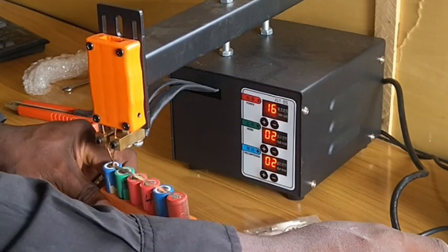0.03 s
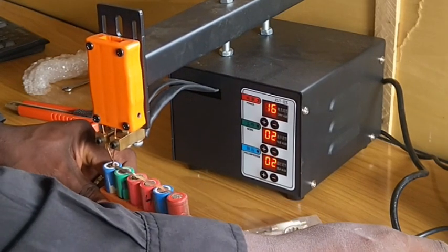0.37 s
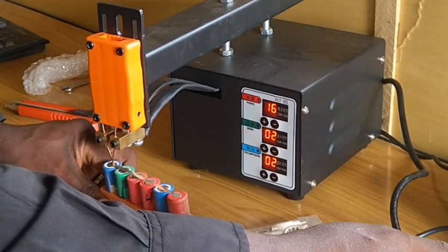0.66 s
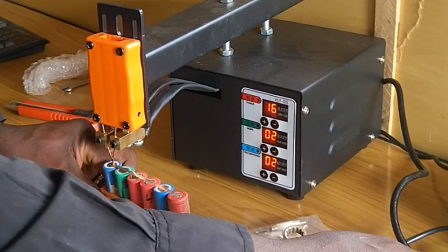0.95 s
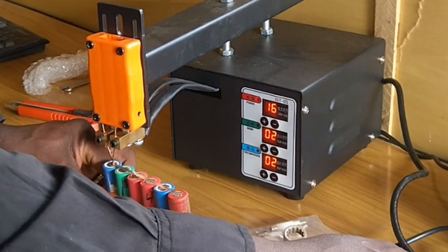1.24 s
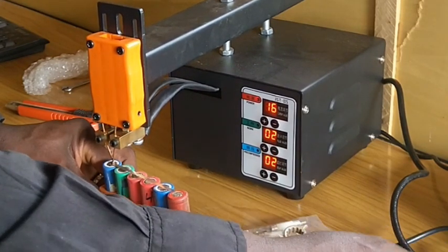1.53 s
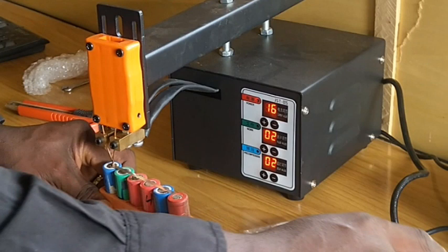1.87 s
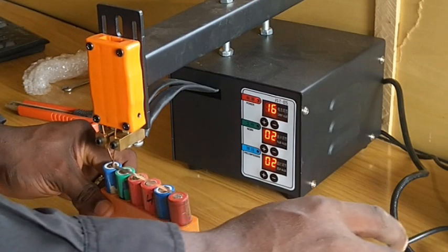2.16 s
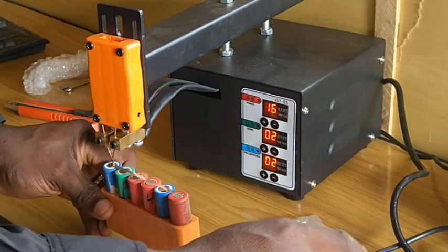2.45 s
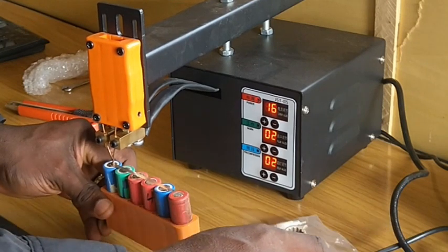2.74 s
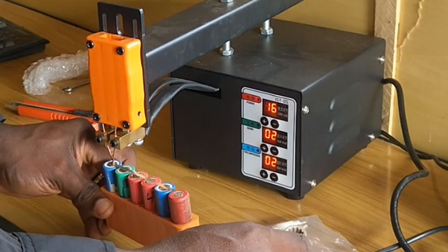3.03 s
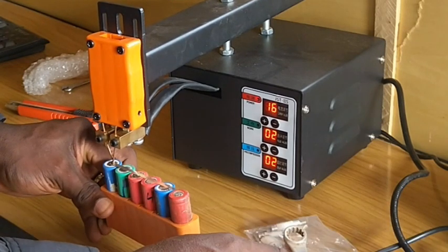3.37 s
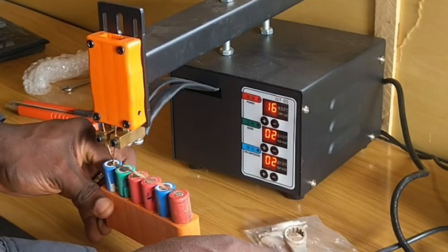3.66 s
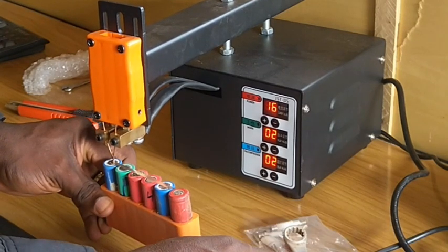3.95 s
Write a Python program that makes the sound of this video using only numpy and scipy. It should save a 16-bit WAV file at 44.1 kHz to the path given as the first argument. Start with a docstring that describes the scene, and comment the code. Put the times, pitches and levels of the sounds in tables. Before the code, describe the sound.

Two sharp metal clacks sound close by as a spot welder's head presses down and springs back in a small workshop. A low rumble runs throughout, with light double clicks, faint pings and hand rubs before and after.

```python
"""A bench spot welder fires once in a small workshop. A low rumble and a soft, swelling wash run throughout;
thin pings, a soft rub and a small double click come first. At 1 s a light catch sounds, the electrode head
clacks down with a crack and a metallic ring, and the current surge gives the case a dull knock. At 1.7 s
the head clacks back up. More pings, double clicks and rubs of hand and sleeve dot the rest."""
import sys
import numpy as np
from scipy import signal
from scipy.fft import rfft, irfft
from scipy.io import wavfile
from scipy.ndimage import uniform_filter1d

SR = 44100
rng = np.random.default_rng(int(sys.argv[2]) if len(sys.argv) > 2 else 0)


def master_out(mix):
    """Clip the mix to full scale and print it as 16-bit PCM to the path in sys.argv[1]."""
    frames = np.transpose(np.atleast_2d(mix))
    ceiling = np.clip(frames, -1, 1)
    pcm = np.round(ceiling * 32767).astype(np.int16)
    wavfile.write(sys.argv[1], SR, pcm)


N = 176400
HEAD_RISE_S = 0.003


def welder():
    """A light catch sounds, then the electrode head clacks down and springs back."""
    # strokes of the head: start_s, gain_db, back (0 = pressing down, 1 = springing back)
    strokes = [(1.0368, 0.12, 0), (1.685, 0.94, 1)]
    # colour of the catch: frequency_hz, level_db
    catch_colour = [(300, -10), (900, 4), (1300, 3), (1750, -14.5), (2800, -1), (4400, 0), (6800, -12),
                    (9000, -29), (15000, -33)]
    catch_s, catch_db, catch_t60_s = 1.004, -20.5, 0.092
    out, t = np.zeros((2, N)), np.arange(SR // 4) / SR
    catch = burst(catch_colour, t) * amp(catch_db - 60 * t / catch_t60_s)
    add(out, catch_s, catch * np.minimum(t / HEAD_RISE_S, 1))
    for start_s, gain_db, back in strokes:
        add(out, start_s, amp(gain_db) * clack(back))
    return out


def clack(back):
    """A crack of metal contact sets the head ringing; the bench top reflects both."""
    # colour of the contact crack: frequency_hz, down_db, back_db
    crack_colour = [(300, -27.5, -17.5), (702, 0, -2), (1263, -14, -1), (1430, -18, -17), (1910, -26, -21),
                    (2270, -8, -8), (3200, 6, -1.5), (5180, 3, 0.5), (6700, -2.5, -10), (7300, -10, -9.5),
                    (9220, -8.5, -10.5), (10500, -12.5, -7.5), (15490, -12, -3)]
    # modes of the head: pitch_hz, down_db, back_db, t60_s
    head_modes = [(1270, -34, -29.5, 0.072), (2240, -24, -36, 0.04), (2790, -14.5, -27, 0.041),
                  (3003, -16.5, -25, 0.036), (3250, -18.5, -31, 0.036), (3592, -13.5, -14.5, 0.037),
                  (3765, -16, -19, 0.044), (4178, -7.5, -27, 0.028), (4436, -17, -26.5, .04),
                  (4970, -30, -17.5, .055), (5050, -35, -30, .21), (5290, -18.5, -24, .05),
                  (5800, -28.5, -28, 0.034), (6400, -25, -20, .035), (13370, -42, -21.5, 0.049)]
    # stereo placement of the head: frequency_hz, left_minus_right_db
    head_pan = [(1000, -0.5), (2400, -1.5), (4400, 2), (8000, 3), (15000, 5.5)]
    crack_db, crack_rise_s, crack_t60_s = -5, 0.0018, 0.043
    head_db, pressed_ring = 2, 0.8  # pressing on the work shortens the ring to this share
    bench_db, bench_delay_s, right_delay_s = -14.5, 0.0054, 0.000045
    t = np.arange(SR // 4) / SR
    hz = np.fft.rfftfreq(len(t), 1 / SR)
    crack = burst([(f, up if back else down) for f, down, up in crack_colour], t)
    crack *= np.minimum(t / crack_rise_s, 1) * amp(crack_db - 60 * t / crack_t60_s)
    modes = [(f, up, t60) if back else (f, down, t60 * pressed_ring) for f, down, up, t60 in head_modes]
    body = rattling(modes, t) * amp(head_db) * np.minimum(t / HEAD_RISE_S, 1)
    bench_echo = amp(bench_db) * np.exp(-2j * np.pi * hz * bench_delay_s)
    stereo = pan(curve_at(head_pan, hz)) * np.exp(-2j * np.pi * hz * np.array([[0], [right_delay_s]]))
    return irfft(rfft(crack + body) * (1 + bench_echo) * stereo, len(t))


def rattling(modes, t, line_width_hz=150, settle_s=0.07):
    """Dying modes whose pitch jitters until the loose parts settle."""
    phase_step = np.sqrt(2 * np.pi * line_width_hz / SR * np.exp(-t / settle_s))
    drifts = np.cumsum(phase_step * rng.standard_normal((len(modes), len(t))), axis=1)
    return sum(amp(db - 60 * t / t60) * np.sin(2 * np.pi * hz * t + drift)
               for (hz, db, t60), drift in zip(modes, drifts))


def weld_pulse(start_s=1.0466, rise_s=0.0024, thud_db=-16.5, thud_t60_s=0.072):
    """The current surge gives the case one short, dull knock."""
    # modes of the case: pitch_hz, level_db, t60_s
    case_modes = [(698, -14.5, 0.025), (860, -7.5, 0.021), (1020, -20, 0.063)]
    # colour of the noisy thud in the knock: frequency_hz, level_db
    thud_colour = [(300, -23), (550, -4), (680, 7.5), (1050, 7), (1250, -5), (1500, -22), (3000, -50)]
    out, t = np.zeros((2, N)), np.arange(SR // 4) / SR
    thud = burst(thud_colour, t) * amp(thud_db - 60 * t / thud_t60_s)
    add(out, start_s, (ring(case_modes, t) + thud) * np.minimum(t / rise_s, 1))
    return out


def clicks(split_hz=4500, snap_t60_s=0.0092, pan_db=-4):
    """Light clicks, mostly in pairs: a bright snap and a very short ring."""
    # the clicks: start_s, low_ring_db, high_ring_db, snap_db
    hits = [(.034, -65, -63.5, -51), (0.465, -53, -40.5, -63.5), (0.4838, -37, -44.5, -61),
            (1.3100, -62, -40, -49), (1.3308, -34.5, -34.5, -58), (1.3488, -38, -51, -48.5),
            (2.1666, -38, -35, -48.5), (2.1896, -39.5, -44, -40), (3.0234, -37.5, -42, -65),
            (3.0487, -39, -36, -59), (3.463, -65.5, -59, -56), (3.8845, -42, -40, -41.5),
            (3.9031, -37, -48, -62.5)]
    # ring of a click: pitch_hz, level_db, t60_s
    click_modes = [(2140, -12, .015), (2490, -2.5, 0.01), (3380, -17, 0.0077), (5400, -9.5, 0.0071),
                   (5980, -8, 0.01)]
    out, t = np.zeros((2, N)), np.arange(SR // 20) / SR
    for start_s, low_db, high_db, snap_db in hits:
        modes = [(hz, db + (low_db if hz < split_hz else high_db), t60) for hz, db, t60 in click_modes]
        snap = rng.standard_normal((2, len(t))) * amp(snap_db - 60 * t / snap_t60_s)
        add(out, start_s, ring(modes, t) + snap)
    return out * pan(pan_db)


def pings():
    """Faint, thin pure tones that start abruptly and fade, each cut off after a second."""
    # the pings: start_s, pitch_hz, level_db, t60_s, left_minus_right_db
    tones = [(0.035, 13372, -48, 0.54, 6.5), (.036, 10630, -72, 1.3, -0.5), (.036, 2638, -66.5, 5.4, 1),
             (1.751, 9118, -46.5, 0.64, 2.5), (2.18, 15700, -50, .1, 3), (3.465, 10206, -46, 0.67, 5),
             (3.465, 1970, -62, 5, -4)]
    out, t = np.zeros((2, N)), np.arange(SR) / SR
    for start_s, pitch_hz, level_db, t60_s, pan_db in tones:
        add(out, start_s, ring([(pitch_hz, level_db, t60_s)], t) * pan(pan_db))
    return out


def rubs(relative_width=0.15):
    """Hand and sleeve rub: brief swells of friction noise, each in one broad resonance."""
    # the rubs: middle_s, length_s, resonance_hz, level_db
    gestures = [(.42, 0.17, 1140, -46.5), (2.44, .15, 1040, -42.5), (2.54, 0.14, 1140, -45.5),
                (3.319, .2, 980, -47.5), (3.599, .24, 1184, -49), (3.85, .14, 923, -43.5)]
    out = np.zeros((2, N))
    for middle_s, length_s, resonance_hz, level_db in gestures:
        t = np.arange(0, length_s, 1 / SR)
        hz = np.fft.rfftfreq(len(t), 1 / SR)
        resonance = 1 / (1 + ((hz / resonance_hz - 1) / relative_width) ** 4)
        noise = rng.standard_normal((2, SR))[:, :len(t)]
        friction = unit_rms(irfft(rfft(noise) * resonance, len(t)))
        add(out, middle_s - length_s / 2, amp(level_db) * friction * np.sin(np.pi * t / length_s))
    return out


def room(sound, predelay_s=0.0059):
    """Diffuse reflections of the workshop, the treble dying first."""
    # decay of the workshop: frequency_hz, t60_s
    decay = [(250, 0.71), (1000, .33), (3500, 0.22), (6000, 0.21), (10000, 0.22), (16000, 0.18)]
    hz, t, noise = signal.stft(rng.standard_normal((2, SR // 2)), SR, nperseg=256)
    tail = signal.istft(noise * amp(-60 * t / curve_at(decay, hz)[:, None]), SR)[1]
    tail *= np.clip(np.arange(tail.shape[1]) / SR / predelay_s - 1, 0, 1)
    return signal.fftconvolve(sound.mean(0)[None], tail / np.linalg.norm(tail[0]), axes=1)[:, :N]


def background(rumble_db=-23.5, hiss_db=-62.5, flutter_db=1.6, flutter_hz=(5, 45)):
    """A low rumble and a wash that swells in two bands flutter together over faint hiss."""
    # colours of the four noise beds: frequency_hz, level_db
    rumble_colour = [(15, -35.5), (25, -14.5), (40, -2.5), (68, 0.5), (110, -2.5), (200, -9.5),
                     (400, -19.5), (700, -39.5), (1500, -58.5), (4000, -89.5)]
    mid_colour = [(100, -18), (400, -11.5), (700, -2), (950, 0), (1250, -6), (1450, -10), (1800, -16.5),
                  (3000, -32), (6000, -43.5), (16000, -63.5)]
    low_colour = [(150, -25), (380, -0.5), (520, -2), (700, -4), (900, -12), (1500, -40), (4000, -70.5)]
    hiss_colour = [(500, -1), (2700, 2.5), (4500, -1.5), (7000, -8.5), (8200, -10), (9500, -15),
                   (12500, -16), (15000, -10.5)]
    # fader rides of the wash's two bands: time_s, level_db
    mid_ride = [(0, -55), (.17, -45), (.3, -50), (.42, -44.5), (.6, -43), (.74, -49.5), (1.3, -49.5),
                (1.55, -51.5), (1.83, -44), (2.1, -50.5), (2.46, -43), (2.72, -45.5), (3.0, -44),
                (3.35, -46.5), (3.72, -51.5), (4, -49)]
    low_ride = [(0, -48), (.18, -48.5), (.34, -50.5), (.48, -39.5), (.62, -42.5), (.74, -47), (1.22, -41),
                (1.34, -49.5), (1.48, -41), (1.62, -46.5), (1.82, -45), (2.1, -49.5), (2.38, -38.5),
                (2.6, -39.5), (2.87, -46), (3.03, -42), (3.17, -44), (3.28, -40), (3.42, -41.5), (3.7, -46),
                (3.86, -38.5), (3.92, -43), (3.98, -36.5)]
    hz = np.fft.rfftfreq(N, 1 / SR)
    wobble = irfft(rfft(rng.standard_normal(N)) * (hz > flutter_hz[0]) * (hz < flutter_hz[1]), N)
    flutter = amp(flutter_db * unit_rms(wobble))
    wash = swell(mid_ride) * noise_bed(mid_colour, patch_db=2.1)
    wash += swell(low_ride) * noise_bed(low_colour, patch_db=2.1)
    rumble = amp(rumble_db) * noise_bed(rumble_colour, patch_db=1.0, size=4096)
    hiss = amp(hiss_db) * noise_bed(hiss_colour, patch_db=0)
    return rumble * flutter ** 0.6 + wash * flutter + hiss


def noise_bed(colour, patch_db, size=2048, mono_below_hz=454):
    """Coloured noise with drifting louder and softer patches, narrowing to mono in the bass."""
    # likeness of left and right: frequency_hz, correlation
    likeness = [(250, 1), (500, 0.49), (1000, 0.12), (3000, 0.17), (10000, 0.16)]
    # lean of the bed: frequency_hz, left_minus_right_db
    lean = [(250, -3), (500, 8), (1000, 1), (3000, 0), (10000, -0.5)]
    hz = np.fft.rfftfreq(size, 1 / SR)
    hop = size // 4
    left_re, left_im, own_re, own_im, patches = rng.standard_normal((5, N // hop + 5, len(hz)))
    patches = unit_rms(uniform_filter1d(uniform_filter1d(patches, size=8, axis=0), size=8, axis=1))
    width = 1 - 1 / (1 + (hz / mono_below_hz) ** 3)
    shared = np.clip(1 - width * (1 - curve_at(likeness, hz)), -1, 1)
    left = left_re + 1j * left_im
    right = shared * left + np.sqrt(1 - shared ** 2) * (own_re + 1j * own_im)
    frames = np.array([left, right]) * amp(curve_at(colour, hz) + patch_db * patches)
    frames *= pan(width * curve_at(lean, hz))[:, None]
    return unit_rms(signal.istft(frames.transpose(0, 2, 1), nperseg=size, noverlap=size - hop)[1][:, :N])


def ring(modes, t):
    """Sum of dying sines."""
    return sum(amp(db - 60 * t / t60) * np.sin(2 * np.pi * hz * t) for hz, db, t60 in modes)


def burst(colour, t):
    """Coloured stereo noise: the many small, dense modes of struck metal."""
    hz = np.fft.rfftfreq(len(t), 1 / SR)
    return irfft(rfft(rng.standard_normal((2, len(t)))) * amp(curve_at(colour, hz)), len(t))


def swell(ride):
    """Gain along a fader ride."""
    return amp(np.interp(np.arange(N) / SR, *np.transpose(ride)))


def amp(db):
    """Decibels to gain."""
    return 10 ** (np.asarray(db) / 20)


def unit_rms(x):
    """Scales to rms 1."""
    return x / np.sqrt(np.mean(x ** 2) + 1e-20)


def curve_at(points, hz):
    """Reads a table on a log-frequency axis."""
    point_hz, values = np.transpose(points)
    return np.interp(np.log(hz + 1), np.log(point_hz + 1), values)


def pan(db):
    """Left and right gains for a level difference."""
    return amp(np.array([np.atleast_1d(db), -np.atleast_1d(db)]) / 2)


def add(mix, start_s, sound):
    """Mixes a sound in at a time."""
    part = mix[:, max(round(start_s * SR), 0):][:, :sound.shape[-1]]
    part += sound[..., :part.shape[1]]


def scene():
    """Welder, weld pulse and clicks feed the room; pings, rubs and background stay dry."""
    bed, machine, knock, ticks = background(), welder(), weld_pulse(), clicks()
    reverb = room(amp(-5.5) * machine + amp(-9.5) * knock + amp(-8.5) * ticks)
    return machine + knock + ticks + reverb + pings() + rubs() + bed


def record(dry, ceiling=0.95, cutoff_hz=15950):
    """A soft ceiling rounds the highest peaks, then a steep low-pass trims the top."""
    limited = dry / (1 + (dry / ceiling) ** 8) ** (1 / 8)
    low_pass = signal.firwin(511, cutoff_hz, window=("kaiser", 9), fs=SR)
    return signal.oaconvolve(limited, low_pass[None], "same")


dry = scene()
out = record(dry)
master_out(out)
```